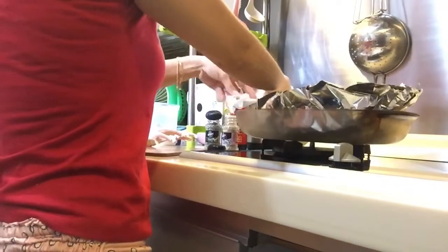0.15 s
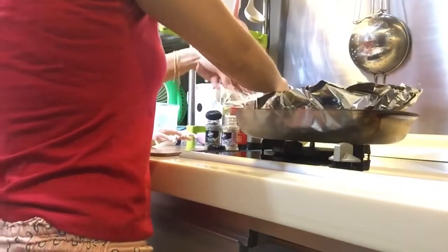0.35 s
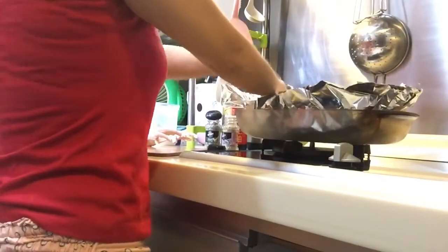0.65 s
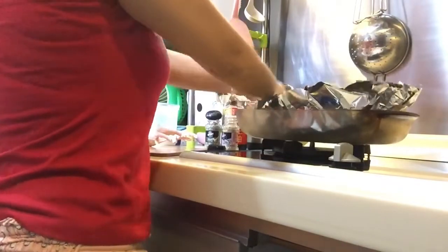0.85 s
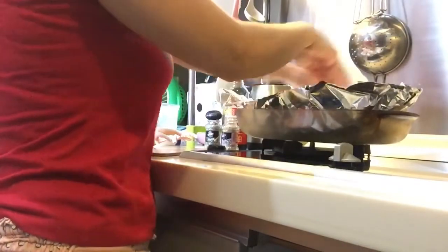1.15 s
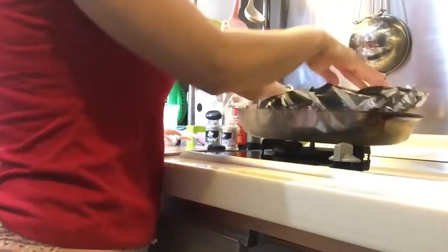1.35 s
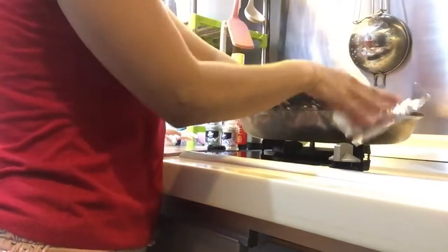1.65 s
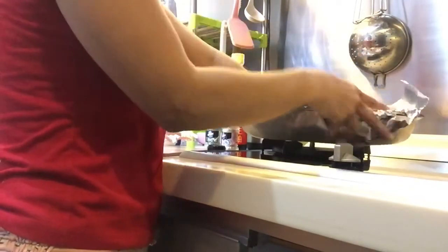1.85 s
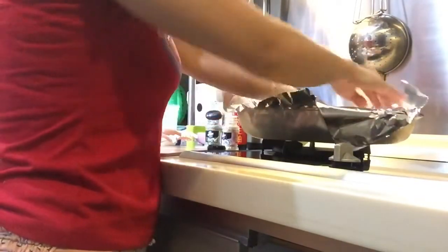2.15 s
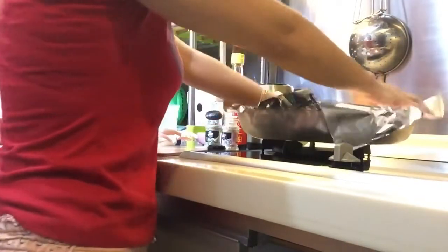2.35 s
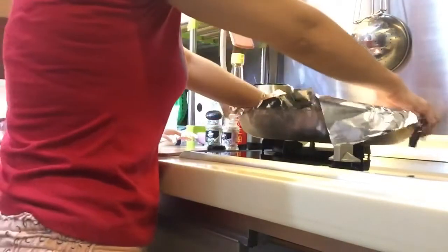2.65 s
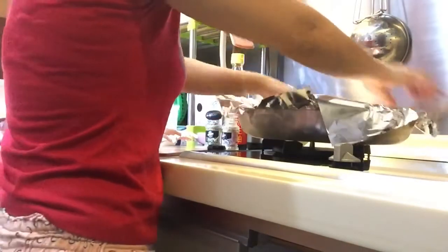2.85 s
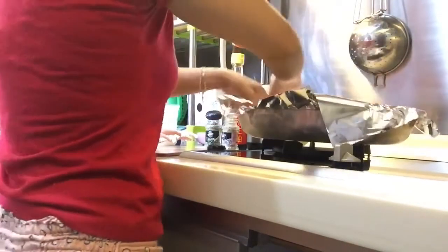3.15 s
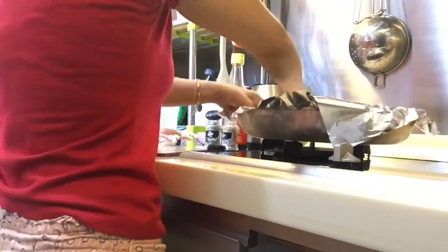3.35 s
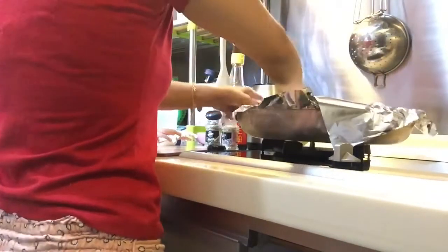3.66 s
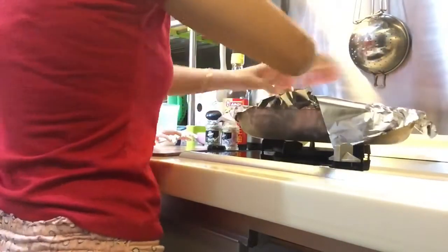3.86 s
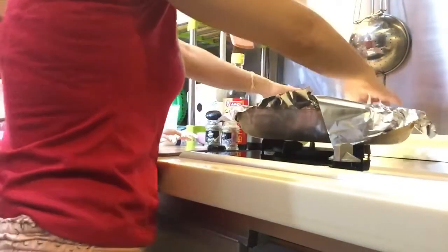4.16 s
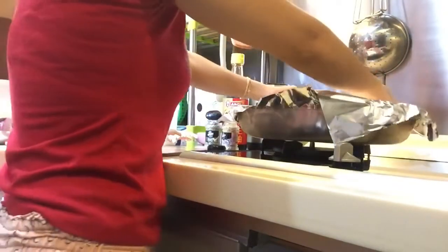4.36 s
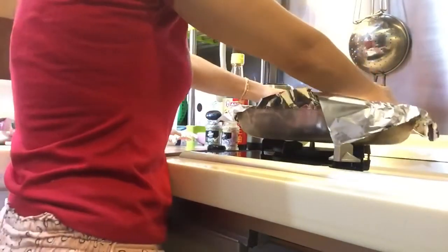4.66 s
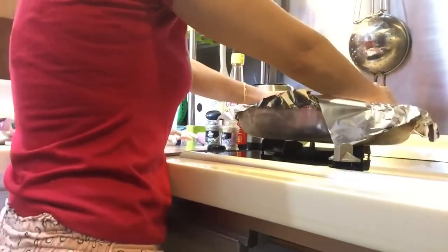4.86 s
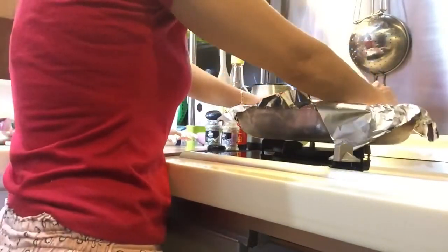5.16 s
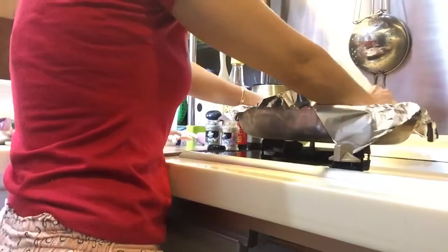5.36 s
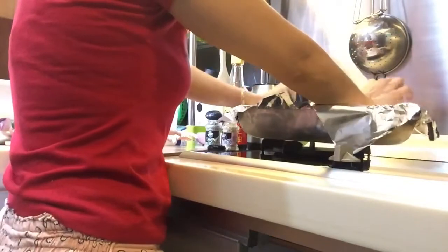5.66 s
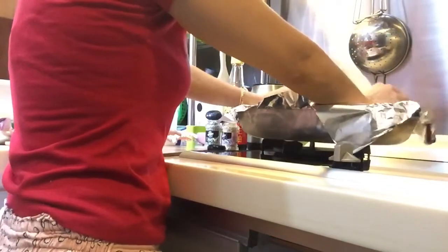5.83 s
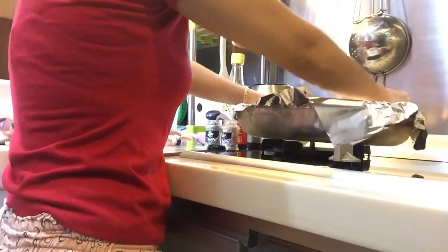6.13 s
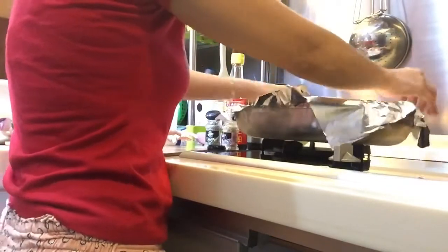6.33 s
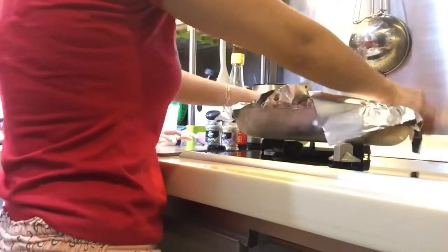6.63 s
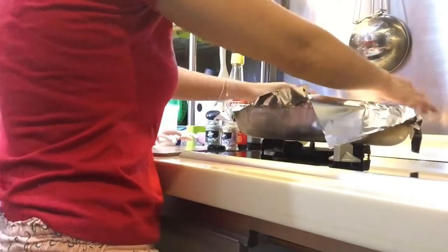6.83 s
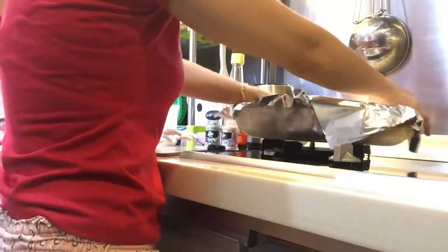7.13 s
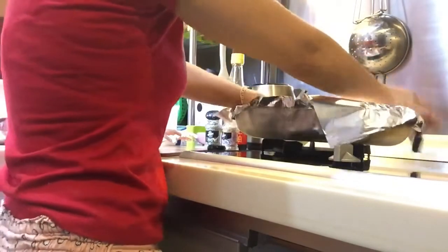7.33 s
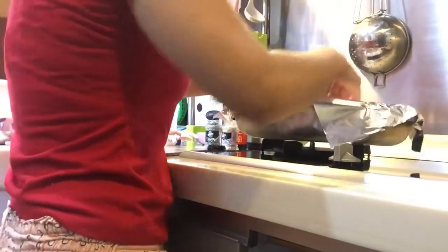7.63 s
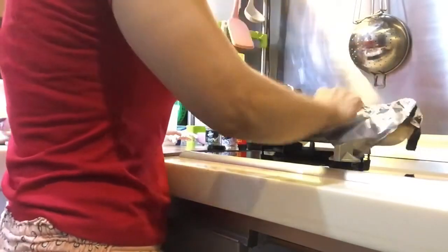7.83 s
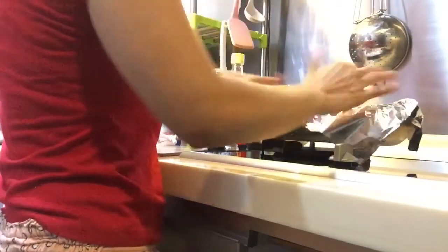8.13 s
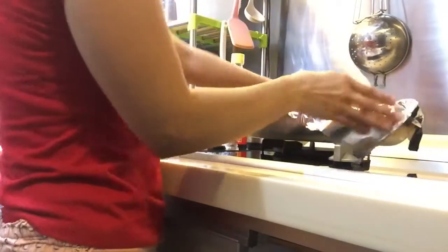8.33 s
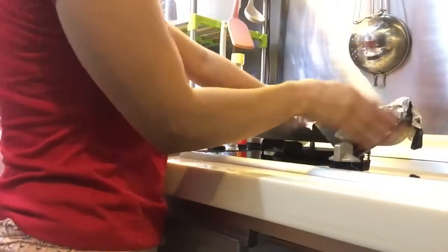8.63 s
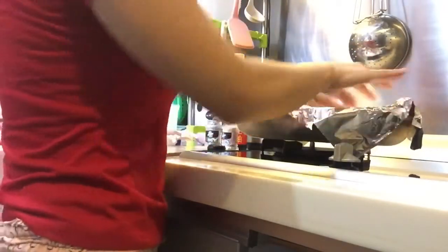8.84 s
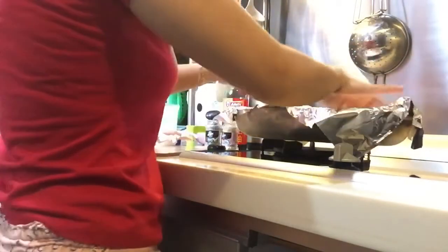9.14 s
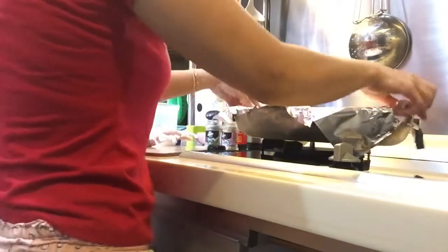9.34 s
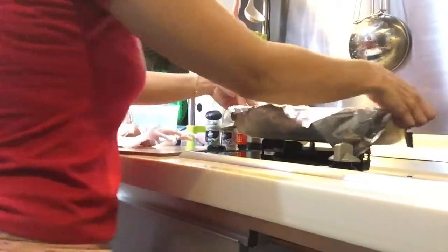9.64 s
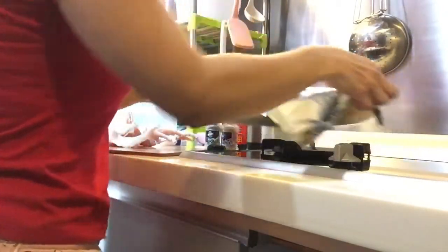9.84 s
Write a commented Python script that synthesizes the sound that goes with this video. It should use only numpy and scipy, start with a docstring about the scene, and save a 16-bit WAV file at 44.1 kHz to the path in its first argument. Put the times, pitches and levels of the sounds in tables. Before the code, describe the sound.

Close, dry crinkling of kitchen foil being moulded round a pan, with irregular metallic thuds and one heavy clunk over low room rumble.

```python
"""A small hard kitchen, mono microphone near enough that direct sound outweighs the reflections.
From the start hands press aluminium foil round a pan on a gas hob: dense showers of creases crackle.
Soon the pan rocks on its iron support; knocks thud and both ring, crowding between 1.4 and 3 s.
The middle is sparser, the heaviest thud falls at 6.3 s, and a loud crackle at 9.1 s precedes the last presses.
Throughout, filtered noise makes the room rumble and hiss and a wavering appliance hum."""
import sys
import numpy as np
from scipy import signal
from scipy.fft import rfft, irfft, next_fast_len
from scipy.io import wavfile

SR = 44100
rng = np.random.default_rng(int(sys.argv[2]) if len(sys.argv) > 2 else 0)


def store_wav(level_fs):
    """Save 16-bit WAV to argv[1]."""
    pcm = np.round(np.clip(np.atleast_2d(level_fs), -1, 1) * 32767)
    wavfile.write(sys.argv[1], SR, pcm.T.astype(np.int16))


N = 440559

# Fingers press the foil and set off showers of creases.
# Each row: start in seconds, rise in seconds (at least 0.002 is used), hold in seconds, level in dB.
FOIL_PRESSES = [(0, 0.0017, 0.025, -37), (.1, .04, .03, -51), (0.159, 0.021, 0.065, -41.5),
                (0.215, 0.078, 0.046, -31), (0.394, .02, 0.042, -40.5), (0.485, 0.015, .03, -48),
                (0.625, .005, .02, -55.5), (0.685, 0.026, .02, -47), (0.715, .02, 0.062, -40.5),
                (0.772, 0.016, 0.084, -31.5), (.9, 0.022, 0.09, -35.5), (1.021, 0.018, 0.0065, -34.5),
                (1.353, .003, 0.15, -30.5), (1.449, 0.025, 0.018, -27), (1.524, 0.022, .1, -36),
                (1.652, 0.036, 0.14, -36), (1.762, 0.017, 0.09, -32.5), (1.855, 0.019, .04, -42.5),
                (1.935, 0.1, 0.073, -33), (2.301, .002, 0.043, -37.5), (2.345, 0.029, 0.084, -31),
                (2.406, 0.035, 0.024, -26), (2.516, 0.019, 0.06, -33), (2.61, .004, .015, -33.5),
                (2.664, 0.022, .07, -40.5), (2.728, .02, 0.077, -32.5), (2.799, 0.025, 0.068, -32.5),
                (2.945, 0.024, 0.0078, -45), (2.997, 0.018, 0.058, -54), (3.193, 0.011, 0.062, -48.5),
                (3.245, 0.054, 0.19, -32), (3.505, .02, .06, -34.5), (3.566, 0.019, .13, -33.5),
                (3.828, 0.0053, 0.0079, -57), (4.124, .006, .01, -56.5), (4.19, .01, 0.05, -62),
                (4.257, 0.011, 0.022, -44), (4.293, 0.014, 0.092, -35.5), (4.415, 0.014, 0.075, -39),
                (4.55, .02, 0.061, -49), (4.613, .01, 0.054, -46), (4.707, .015, 0.023, -43.5),
                (4.75, 0.018, 0.042, -42), (4.877, 0.036, .01, -46), (4.942, .01, 0.023, -38),
                (5.008, 0.025, 0.039, -48), (5.063, .015, .02, -42.5), (5.145, .01, 0.14, -54.5),
                (5.278, 0.011, 0.053, -48), (5.342, 0.025, 0.094, -35), (5.446, 0.0089, .04, -32),
                (5.542, 0.018, 0.064, -39), (5.665, 0.027, 0.093, -35.5), (5.766, 0.022, 0.055, -35.5),
                (5.86, 0.023, .04, -35), (5.988, 0.013, 0.11, -37), (6.105, .015, 0.022, -39.5),
                (6.209, .01, 0.073, -38), (6.306, .005, 0.025, -29), (6.488, 0.017, .02, -36),
                (6.511, 0.041, 0.079, -29), (6.652, 0.017, 0.067, -40), (6.775, 0.017, 0.036, -42),
                (6.985, .01, 0.034, -55), (7.029, 0.02, .03, -34), (7.073, 0.039, 0.055, -30),
                (7.184, .01, 0.12, -28), (7.385, 0.04, 0.052, -35), (7.451, 0.046, 0.046, -29.5),
                (7.72, .01, .02, -54), (7.752, 0.025, 0.13, -30), (7.913, 0.018, 0.11, -41.5),
                (8.054, 0.028, 0.05, -38), (8.145, 0.024, 0.013, -33.5), (8.3, .02, .02, -75),
                (8.404, .002, 0.009, -34.5), (8.437, .01, .04, -41), (8.469, 0.0091, 0.024, -34),
                (8.511, 0.017, 0.052, -24.5), (8.63, 0.018, 0.057, -39), (8.743, 0.008, 0.048, -34),
                (9.08, 0.0086, 0.028, -22.5), (9.195, .02, 0.063, -43), (9.352, 0.036, 0.079, -35),
                (9.504, 0.054, 0.12, -39.5), (9.66, .01, 0.056, -39.5), (9.752, 0.018, 0.018, -36),
                (9.863, .01, .04, -51), (9.95, .015, .03, -49)]
# A shower climbs to its level, sags while held and dies when let go.
RISE_DB, SAG_DB_PER_S, RELEASE_DB_PER_S = 16.5, 19.5, 271
# Below the firm level the rustle dulls, above it brightens: dB per octave for each dB of difference.
FIRM_DB, COARSER_PER_DB = -38.5, 0.1866
# Loose sheet folds broadly, crimped foil does not.
# Each row: time in seconds, change of the largest facets in dB.
BROAD_FOLDS = [(0, 1), (.8, 3), (1.1, -3), (1.5, 0), (1.9, -5), (2.1, -1), (2.4, -6.5), (3.2, -1), (4, 2),
               (4.5, -2.5), (5.2, 0), (5.6, -6.5), (6.2, 1), (6.55, -5), (7.5, -9), (8.15, 0), (8.5, -9),
               (8.75, 2.5), (9.15, -17), (9.4, -0.5), (9.99, -4)]
# Colour of the foil before presses and folds shape it. Each row: frequency in Hz, relative density in dB per Hz.
FOIL_COLOUR = [(240, -40), (400, 4.5), (644, -41), (877, -7.5), (947, -6.5), (1120, -23), (1350, -5),
               (4340, 0), (10300, -5.5), (15100, -11), (15800, -3)]

# The pan rocks on its support. Each row: start in seconds, thud level in dB before hardness,
# pan ring in dB and support ring in dB (both relative to the thud level), hardness in dB per octave,
# first and second mode favoured by the contact point in Hz, strength of those two in dB,
# share of the free decay time left by the hands.
PAN_KNOCKS = [(0.277, -26, -23, -18, 5.5, 605, 1186, -7.5, .96),
              (0.91, -17.5, -15, -23.5, -4, 380, 605, -15, 0.77),
              (0.939, -18, -31, -22, -2.5, 2971, 2112, -21, 0.32),
              (1.409, -10, -24, -12.5, -1, 2350, 2112, -8.5, .56),
              (1.423, -11, -11.5, -14, -1.5, 1944, 2221, -12, 0.77),
              (1.476, -4, -15.5, -16, 2, 2350, 5680, -9.5, 0.39),
              (1.493, -12, -2.5, -10.5, -1.5, 5700, 2405, -3, 0.51),
              (1.554, -8, -18.5, -18, -1.5, 2150, 1600, -13, 0.84),
              (1.99, -12, -16, -17.5, -1.5, 2971, 2221, -10, 0.46),
              (2.085, -13.5, -15, -17, -0.5, 2971, 2221, -8, 0.51),
              (2.136, -17.5, -17.5, -26, -3, 3040, 1944, -14, 0.94),
              (2.493, -12, -21.5, -22.5, 0, 2150, 2221, -14.5, 0.55),
              (2.756, -7, -18, -19.5, 1, 1565, 2221, -16, .53),
              (2.777, -13, -14, -16, -2.5, 1565, 2405, -8, 0.75),
              (2.878, -9.5, -24, -20.5, 0, 1565, 2405, -11, 0.53),
              (2.902, -9.5, -13.5, -21, -1, 2420, 2350, -9, 0.91),
              (2.976, -13.5, -14, -23, -2, 2350, 2420, -10, 0.99),
              (3.621, -22.5, -15, -11, 3.5, 2221, 2150, -12, .51),
              (3.688, -7, -15, -26, 0, 1565, 2350, -13.5, 0.85),
              (5.012, -21, -15, -22, -5, 1565, 1186, -14, 0.78),
              (5.05, -28.5, -20, -20, -6, 1186, 605, -14, 0.9),
              (5.456, -29.5, -13, -13, 2, 605, 1565, -4.5, 0.49),
              (6.173, -9, -20, -23, -2.5, 2150, 2240, -11.5, 0.75),
              (6.305, 9, -36, -19, -.5, 4070, 3040, -22, 0.45),
              (6.33, -2, -16.5, -15.5, -0.5, 1320, 3040, -20, 0.88),
              (6.606, -12, -24, -23, -0.5, 3040, 2150, -10.5, 0.65),
              (7.845, -4, -18, -18, -1.5, 2112, 605, -14.5, 0.53),
              (7.862, -11.5, -25, -20.5, -2.5, 2112, 2221, -6.5, 0.64),
              (8.131, -9.5, -19, -22.5, 0, 2112, 1600, -14, 0.8),
              (8.585, -9.5, -8.5, -15.5, -1, 1600, 2112, -8, 0.37),
              (8.742, -17.5, -19, -29, -3, 2112, 2221, -17, .5),
              (9.69, -11.5, -12, -18, -1.5, 644, 2350, -6, 0.82)]
# Modes of the pan, with the low thump of the hob top below it.
# Each row: frequency in Hz, relative level in dB, undamped 60 dB decay time in seconds.
PAN_MODES = [(380, -15, 0.33), (1186, -10, 0.25), (1565, -8, 0.25), (1918, -8, 0.36), (2405, 2, 0.16),
             (2971, -9.5, 0.2), (3430, 0, 0.039), (4070, -29, 0.19), (4320, -10, 0.12), (4567, 1, 0.074),
             (94, -16, 0.34), (5800, -23, 0.17), (5700, -43, 0.18)]
# Modes of the iron support.
# Each row: frequency in Hz, relative level in dB, undamped 60 dB decay time in seconds.
SUPPORT_MODES = [(322, -8, 0.15), (480, -11.5, 0.11), (605, -4.5, 0.22), (640, 4.5, 0.071),
                 (702, -11, 0.057), (1120, -10, 0.18), (1320, -4.5, 0.24), (1600, -29, 0.097),
                 (2112, 3.5, 0.12), (2150, -6.5, 0.11), (2339, -5, 0.2), (2240, -6, 0.2), (2190, 2, 0.058),
                 (3040, -10.5, 0.18), (3460, -9, 0.12), (5680, -10, 0.088), (6600, -18, 0.24)]
# Colour of the thud in hob and worktop. Each row: frequency in Hz, relative density in dB per Hz.
THUD_COLOUR = [(40, -13), (80, -28), (180, -15), (310, 4), (450, -6.5), (650, 0.5), (1300, -0.5),
               (2300, -3), (4200, 0), (5000, -10), (6300, -9), (12000, -50)]
# How long the thud lasts. Each row: frequency in Hz, undamped 60 dB decay time in seconds.
THUD_DECAY = [(100, 0.38), (600, 0.26), (2500, 0.21), (9000, 0.36)]

# Colour of the room tone. Each row: frequency in Hz, relative density in dB per Hz.
ROOM_COLOUR = [(20, -62), (50, -3), (100, -7), (180, -5), (300, -9), (500, -15.5), (1000, -14), (1900, -19),
               (3000, -23), (5000, -37), (8000, -44), (15000, -62)]
# Wavering appliance hum. Each row: frequency in Hz, width in Hz, level in dB.
HUM_LINES = [(95.7, 2.9, -61.5), (175.5, 11.6, -50.5), (198.2, 4.2, -54.5)]
# Dips in the microphone's response. Each row: frequency in Hz, width in Hz, depth in dB.
RESPONSE_DIPS = [(4960, 610, -3), (10400, 1900, -4.5)]

ROOM_TONE_DB = -41.5
KITCHEN_T60_S, KITCHEN_DB = 0.22, -7.5
MIC_LOW_HZ, CUTOFF_HZ = 45.3, 15750


def from_db(db):
    """Decibels to gain."""
    return 10 ** (np.asarray(db) / 20)


def rms_one(x):
    """Scale to unit rms."""
    return x / np.sqrt(np.mean(x ** 2) + 1e-20)


def at_hz(points, hz):
    """Read a table on a log-frequency axis."""
    table_hz, values = np.array(points).T
    return np.interp(np.log(hz), np.log(table_hz), values)


def coloured(x, gain_of_hz):
    """Filter by a gain given as a function of frequency."""
    size = next_fast_len(N)
    hz = np.maximum(np.arange(size // 2 + 1) * SR / size, 1)
    return irfft(rfft(x, size) * gain_of_hz(hz), size)[..., :N]


def drift(rate):
    """Random wander: straight lines between normal draws of spread 1, rate draws a second."""
    knots = rng.standard_normal(int(N / SR * 400))
    return np.interp(np.arange(N) / SR * rate, np.arange(len(knots)), knots)


def ring(clicks, hz, t60):
    """A two-pole resonator: a unit click starts a dying sine of initial height 1."""
    radius = from_db(-60 / (t60 * SR))
    step = 2 * np.pi * hz / SR
    return signal.lfilter([0, np.sin(step)], [1, -2 * radius * np.cos(step), radius ** 2], clicks + 1e-18)


def dying(start_s, t60):
    """Slice from the start on, and the exponential fall over it."""
    start = round(start_s * SR)
    t = np.arange(min(N - start, round(1.5 * t60 * SR))) / SR
    return slice(start, start + len(t)), from_db(-60 * t / t60)


def foil(per_s=20000, spread_db=1.0, cycles=7.2, clump_db=1.0, slips_per_s=22.0, slip_power=0.24, slip_s=0.026):
    """Each buckling facet clicks and rings a few cycles; facet size sets its pitch."""
    level_db = pressing()
    coarseness = COARSER_PER_DB * (FIRM_DB - level_db)
    folds_db = np.interp(np.arange(N) / SR, *np.transpose(BROAD_FOLDS))

    # one buckle frees the next, so a slip starts a sudden clump that dies away
    slips = slip_power * rng.exponential(1, N) * (rng.random(N) < slips_per_s / SR)
    clumps = 1 + signal.lfilter([1], [1, -np.exp(-1 / (slip_s * SR))], slips)
    activity = np.sqrt(clumps / clumps.mean()) * from_db(level_db + clump_db * drift(25))

    sizes = from_db(spread_db * np.minimum(rng.exponential(1, N), 5)) * rng.choice([-1, 1], N)
    clicks = sizes * (rng.random(N) < per_s / SR)

    # every click is dealt to one of 30 facet pitches
    pitches = np.geomspace(450, 15100, 30)
    dealt = rng.integers(0, 30, N)
    weights = from_db(at_hz(FOIL_COLOUR, pitches)) * np.sqrt(pitches)  # wider bands higher up
    weights /= np.sqrt(np.sum(weights[pitches > 7000] ** 2))
    out = np.zeros(N)
    for k, hz in enumerate(pitches):
        t60 = cycles * (hz / 4000) ** 0.94 / hz
        facet = rms_one(ring(clicks * (dealt == k), hz, t60))
        # coarse crumpling favours large facets; broad folds change only those below 3500 Hz
        shift_db = coarseness * np.log2(10000 / hz) + folds_db * np.clip(np.log2(3500 / hz), 0, 1)
        out += weights[k] * from_db(shift_db) * facet
    return activity * out


def pressing():
    """Level of the foil in dB: every press climbs, sags while held and dies; their powers add."""
    power = np.full(N, 1e-10)
    for start_s, rise_s, hold_s, level_db in FOIL_PRESSES:
        start = round(start_s * SR)
        rise_s = max(rise_s, .002)
        t = np.arange(min(N - start, round(.7 * SR))) / SR - rise_s  # zero at the top of the climb
        shape_db = RISE_DB * np.minimum(t / rise_s, 0)
        shape_db -= SAG_DB_PER_S * np.clip(t, 0, hold_s)
        shape_db -= RELEASE_DB_PER_S * np.maximum(t - hold_s, 0)
        power[start:start + len(t)] += from_db(2 * (level_db + shape_db))
    return 10 * np.log10(power)


def rings(scatter_db=3.5, chatter_s=.012, chatter_db=-22.5):
    """Each knock rings pan and support; the contact point favours two modes, the hands damp them all."""
    out = np.zeros(N)
    t = np.arange(round(.4 * SR)) / SR
    hz, level_db, t60 = np.transpose(PAN_MODES + SUPPORT_MODES)[..., None]
    on_pan = np.arange(len(hz))[:, None] < len(PAN_MODES)
    for start_s, peak_db, pan_db, support_db, hardness, first_hz, second_hz, favoured_db, free in PAN_KNOCKS:
        start = round(start_s * SR)
        strength_db = level_db + np.where(on_pan, pan_db, support_db)
        strength_db += hardness * np.log2(np.maximum(hz, 300) / 2000)
        strength_db += scatter_db * rng.standard_normal(hz.shape)
        favoured = np.argmin(np.abs(hz - [first_hz, second_hz]), axis=0)
        strength_db[favoured] = favoured_db
        strength = from_db(strength_db) * rng.choice([-1, 1], hz.shape)
        modes = strength * from_db(-60 * t / (t60 * free)) * np.sin(2 * np.pi * hz * t)
        sound = np.sum(modes, axis=0)

        contact = np.zeros(round(.03 * SR))  # first touch, then a few weaker bounces
        bounces = (rng.random(5) * chatter_s * SR).astype(int)
        contact[bounces] = from_db(chatter_db) * rng.standard_normal(5)
        contact[0] = 1
        sound = signal.fftconvolve(sound, contact)[:N - start]
        out[start:start + len(sound)] += from_db(peak_db) * sound
    return out


def thuds(crest_db=10.0, rattle_s=0.0075):
    """The hob and worktop take each knock as a short rattle and a dense thud that dies band by band."""
    out = np.zeros(N)
    noise = rms_one(coloured(rng.standard_normal(N), lambda hz: from_db(at_hz(THUD_COLOUR, hz))))
    edges = 35 * 2. ** np.arange(0, 9.5)  # octave bands in Hz
    for low, high in zip(edges, edges[1:]):
        hz = np.sqrt(low * high)
        envelope = np.zeros(N)
        for start_s, peak_db, _, _, hardness, *_, free in PAN_KNOCKS:
            gain = from_db(peak_db - crest_db + hardness * np.log2(max(hz, 300) / 2000))
            t60 = at_hz(THUD_DECAY, hz) * free
            where, fall = dying(start_s, t60)
            held = from_db(60 * rattle_s / t60)  # level holds while the pan rattles
            envelope[where] += gain * np.minimum(fall * held, 1)
        band = signal.butter(2, [low, high], "band", fs=SR, output="sos")
        out += signal.sosfilt(band, noise * envelope)
    return out


def kitchen(x):
    """Dense reflections from tiles and worktop, dying away as decaying noise."""
    t = np.arange(round(.5 * SR)) / SR
    onset = np.minimum(t / 0.00043, 1)
    tail = rng.standard_normal(len(t)) * from_db(-60 * t / KITCHEN_T60_S) * onset
    return signal.fftconvolve(x, tail / np.sqrt(np.sum(tail ** 2)))[:N]


def room_tone():
    """Steady rumble and hiss from coloured noise; narrow bands of noise waver as hum lines."""
    noise = coloured(rng.standard_normal(N), lambda hz: from_db(at_hz(ROOM_COLOUR, hz)))
    out = from_db(ROOM_TONE_DB) * rms_one(noise)
    for line_hz, width_hz, level_db in HUM_LINES:
        line = coloured(rng.standard_normal(N), lambda hz: 1 / (1 + (2 * (hz - line_hz) / width_hz) ** 2))
        out += from_db(level_db) * rms_one(line)
    return out


def scene():
    """Foil and pan in the kitchen over the room tone, the same in both channels."""
    near = foil() + rings() + thuds()
    mono = near + from_db(KITCHEN_DB) * kitchen(near) + room_tone()
    return np.array([mono, mono])


def record(dry):
    """Bass roll-off and two dips in the microphone's response, rounded peaks, the top cut."""
    dry = signal.sosfilt(signal.butter(2, MIC_LOW_HZ, "high", fs=SR, output="sos"), dry)
    for hz, width_hz, depth_db in RESPONSE_DIPS:
        b, a = signal.iirpeak(hz, hz / width_hz, fs=SR)
        dry = dry + (from_db(depth_db) - 1) * signal.lfilter(b, a, dry)
    rounded = .95 * np.tanh(dry / .95)
    top_cut = signal.ellip(16, .3, 95, CUTOFF_HZ, fs=SR, output="sos")
    return signal.sosfilt(top_cut, rounded)


dry = scene()
out = record(dry)
store_wav(out)
```